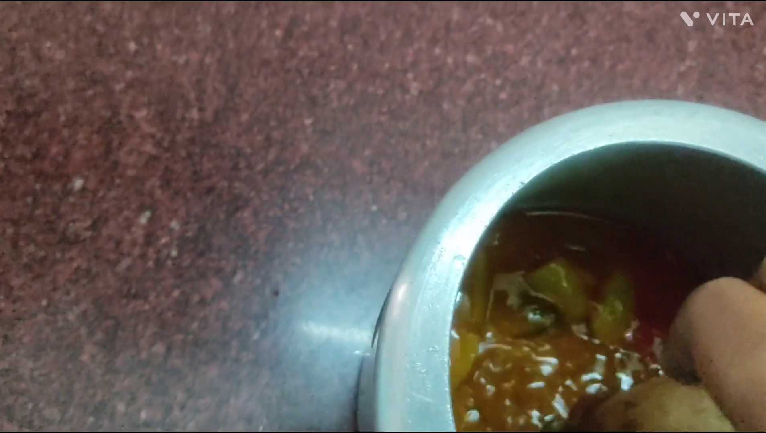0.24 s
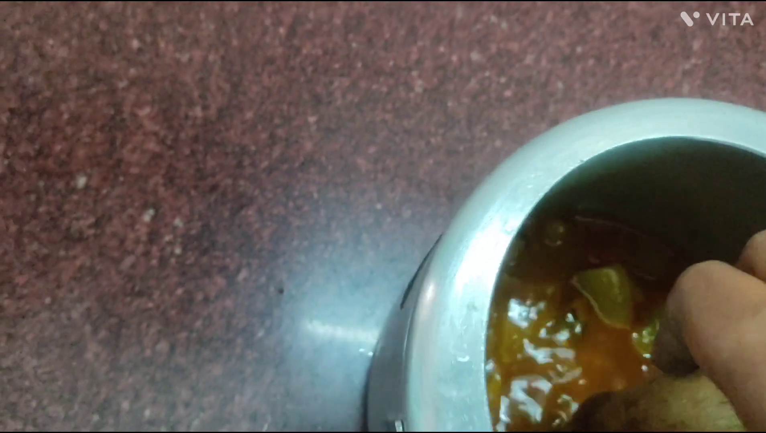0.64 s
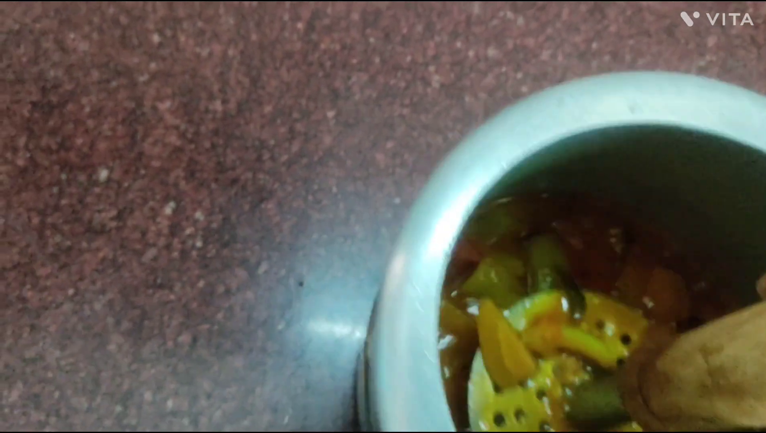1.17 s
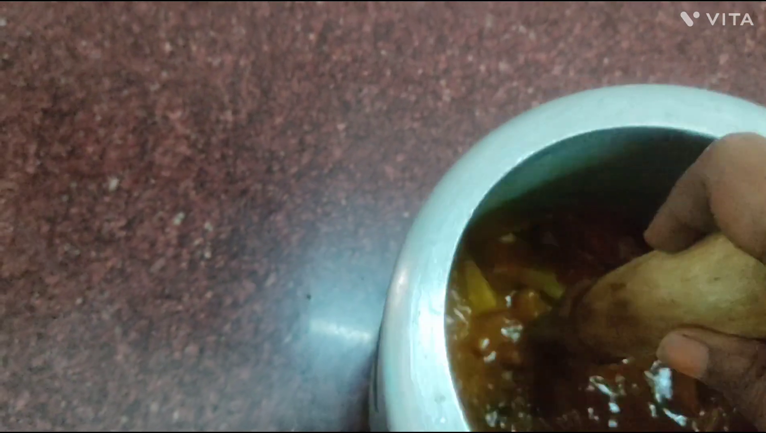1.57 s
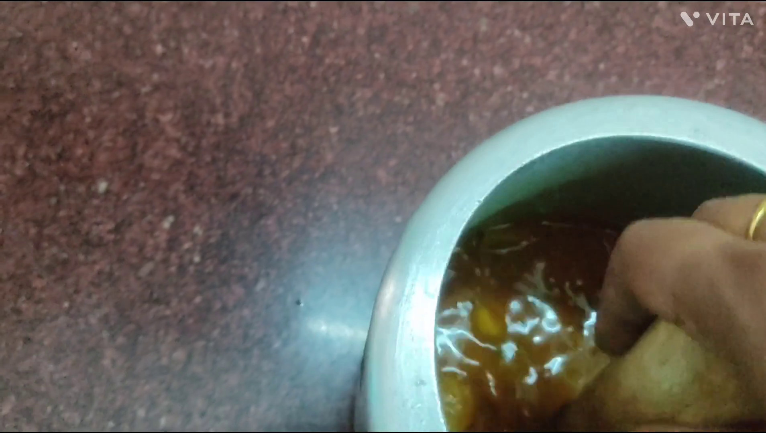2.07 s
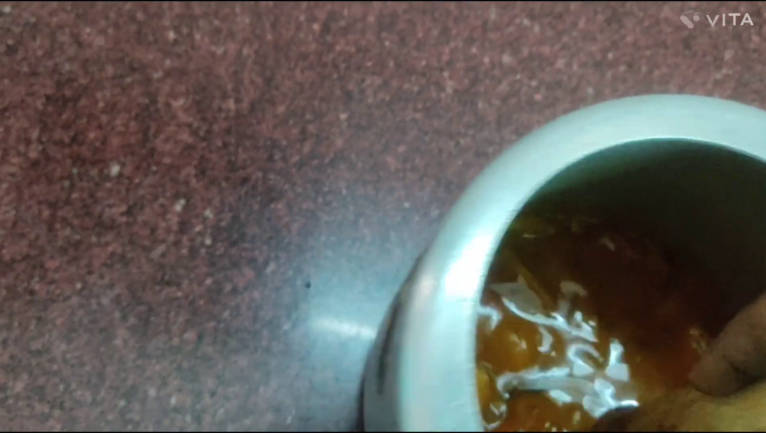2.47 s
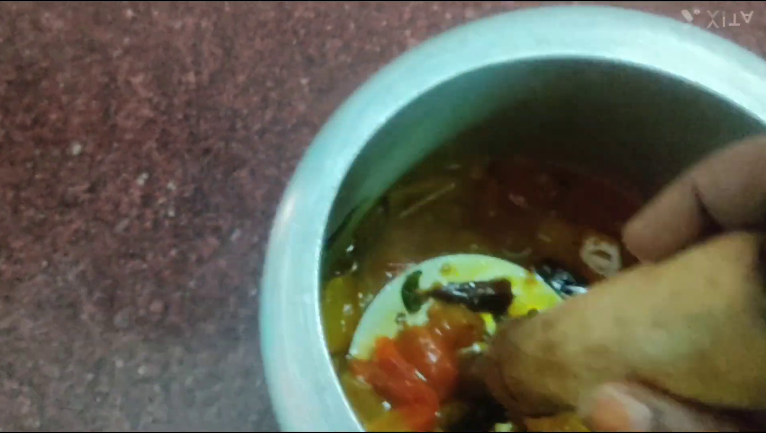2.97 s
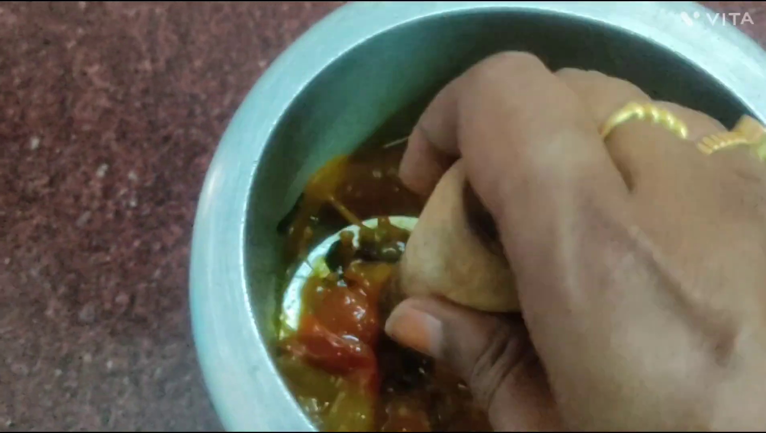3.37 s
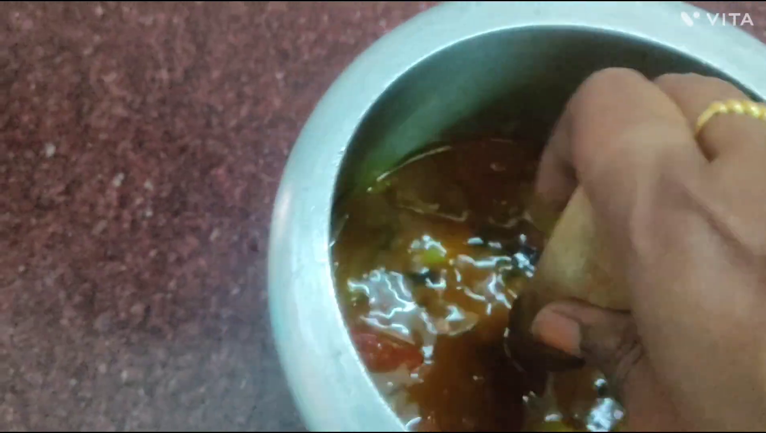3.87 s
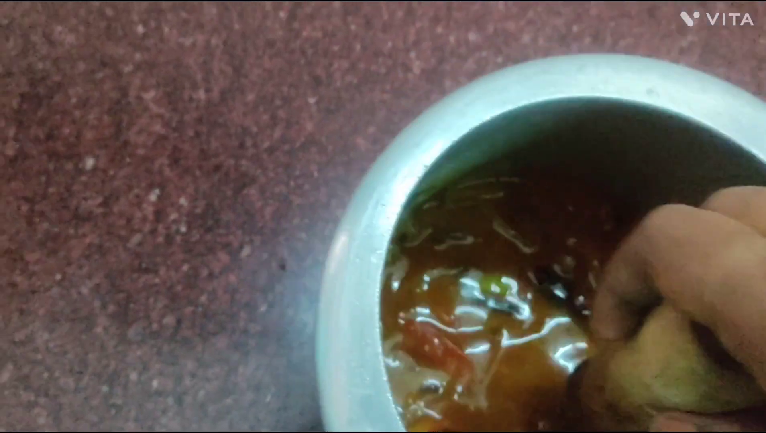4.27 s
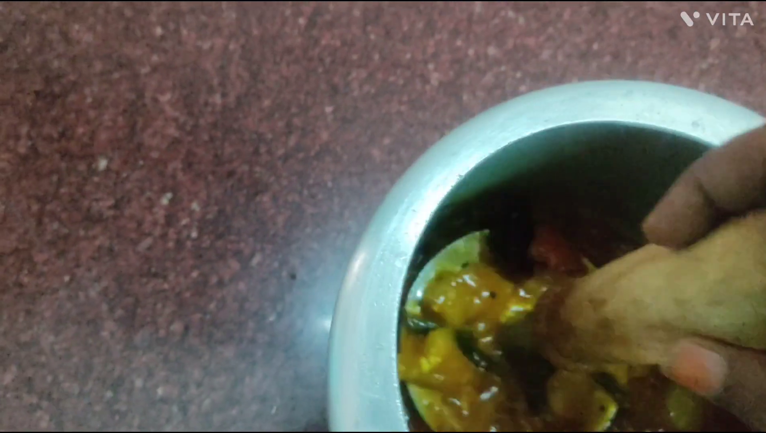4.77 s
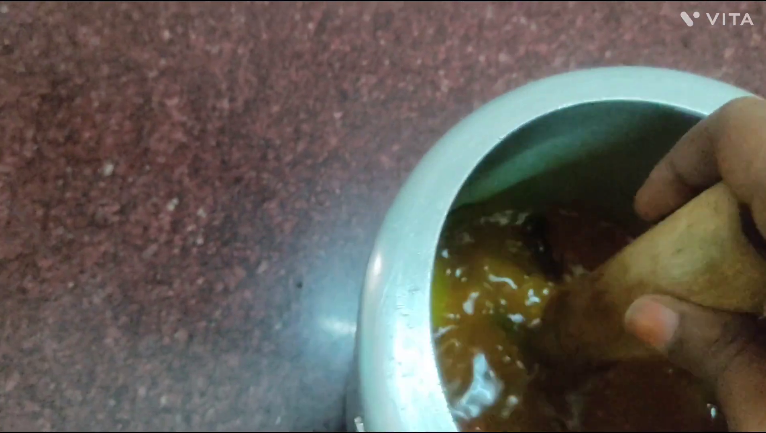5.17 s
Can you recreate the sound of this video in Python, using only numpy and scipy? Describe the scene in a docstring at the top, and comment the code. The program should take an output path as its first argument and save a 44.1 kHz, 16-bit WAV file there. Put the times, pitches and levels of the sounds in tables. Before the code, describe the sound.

Close up in a kitchen, a perforated masher presses soft vegetables in a metal pot. A double knock comes near one second, then wet clicks and faint bird chirps, another knock group near three, a squelchy burst of snaps at three and a half, a quiet lull, then clanks and a bright rim ring at five. Treble leans right; the hum is very low.

```python
"""A masher presses soft vegetables in gravy inside a metal pot: its plate knocks the pot (decaying modes,
thump, crack) and the bare rim rings once. Short treble snaps are wet smacks and the sharp cracks of
knocks and rim; gravy squelches (crackling noise), bubbles and gulps glide. Behind: a chirping bird (swept
whistle), slosh, rub, whine, sizzle and kitchen hum (shaped noise). Random echo taps and the tone colour
of each channel, with a sharp treble resonance on the right, shape the near sounds."""
import sys
import numpy as np
from scipy import signal
from scipy.io import wavfile
from scipy.ndimage import uniform_filter1d

SR = 44100
rng = np.random.default_rng(int(sys.argv[2]) if len(sys.argv) > 2 else 0)


def log_audio(samples):
    """Write samples as a 16-bit WAV file to the path given in sys.argv[1]."""
    # one column per channel
    frames = np.atleast_2d(samples).T
    # limit to full scale, then quantise
    limited = np.clip(frames, -1, 1)
    pcm = np.round(limited * 32767).astype(np.int16)
    wavfile.write(sys.argv[1], SR, pcm)


N = 239815

# kitchen hum spectrum: (frequency [Hz], relative density [dB])
HUM_SPECTRUM = [(5, 5.5), (25, 1.5), (45, -12), (70, -6), (110, -10.5), (250, -14), (660, -22),
                (1100, -27.5), (4000, -32.5), (5200, -57)]
HUM_LEVEL_DB = -63
# fine sizzle of the hot gravy: (frequency [Hz], relative density [dB]); (time [s], level [dB])
SIZZLE_SPECTRUM = [(1760, -61), (3000, -35.5), (3650, -31.5), (3960, -16.5), (4200, -16.5), (4690, -18),
                   (5300, -16), (6410, -17.5), (7000, -1), (7240, 0), (7630, -4.5), (8040, -12),
                   (9600, -21.5), (10300, -48.5), (15600, -84), (22000, -120)]
SIZZLE_LEVEL = [(0, -61.5), (.25, -59), (.5, -66), (.75, -59), (0.948, -64), (1.4, -62.5), (1.85, -65.5),
                (2.199, -60.5), (2.45, -63.5), (3.05, -58.5), (3.151, -64), (3.5, -75), (4, -58.5),
                (4.3, -69.5), (4.48, -57.5), (5.3, -63), (5.39, -57.5)]
# faint thin whine that dies away: (frequency [Hz], relative density [dB]); (time [s], level [dB])
WHINE_SPECTRUM = [(4500, -54.0), (4680, 2.0), (4760, 0.5), (4950, -55.0)]
WHINE_LEVEL = [(.3, -74.5), (.6, -80), (.75, -96.5)]
# wet rub along the wall: (frequency [Hz], relative density [dB]); (time [s], level [dB])
RUB_SPECTRUM = [(3600, -42.5), (4300, -7.5), (5500, 4), (6300, -3.5), (7000, -34.5)]
RUB_LEVEL = [(0, -78), (.7, -70), (1.6, -63.5), (2.201, -68), (2.4, -93.5)]
# low slosh of the stirred pot: (frequency [Hz], relative density [dB]); (time [s], relative level [dB])
SLOSH_SPECTRUM = [(60, -46.0), (130, -5.0), (190, 7), (300, -2.0), (500, -16.5), (900, -42.5)]
SLOSH_LEVEL = [(0.0, -122), (0.98, -71), (1.15, -63.5), (2.54, -67.5), (2.88, -57.5), (4.3, -65),
               (4.851, -54.5), (5.44, -66)]
# stereo of steady sounds: (frequency [Hz], left minus right [dB])
STEREO_LEAN = [(60, 4), (110, 2), (200, 3), (380, 5), (700, 4.5), (1290, -2.5), (2380, -1), (4400, -8.5),
               (8120, -13.5), (15000, 8.5)]
# stereo of steady sounds: (frequency [Hz], likeness of the channels [0-1])
STEREO_LIKENESS = [(60, 0.2), (180, 0.17), (550, 0.73), (1650, 0.025), (4970, 0.05), (15000, 0.59)]

# late kitchen echo: (frequency [Hz], t60 [s])
KITCHEN_T60 = [(150, 1), (500, 0.74), (1500, 0.65), (4000, 0.69), (9000, 0.44)]
ECHO_TURN_HZ, EARLY_T60_S = 6.5, 0.041
# tone colour of each channel, treble resonance on the right, steep drop above 10 kHz:
# (frequency [Hz], gain [dB])
LEFT_COLOUR = [(40, -11), (150, 1.5), (700, 1), (1200, -1), (2000, 1.5), (5000, -11), (8500, -3),
               (9600, -2), (10300, -13.5), (15000, -47)]
RIGHT_COLOUR = [(40, -15.5), (150, -3), (700, -2), (2000, 4), (5500, 3), (6600, 3), (7500, 13), (8400, 5.5),
                (9600, -5.5), (10300, -19), (15000, -33)]
BAND_LIMIT_HZ = 15700

# rising bird chirps: (time [s], length [s], top frequency [Hz], relative level [dB])
CHIRPS = [(1.455, 0.044, 5560, -57), (1.649, 0.056, 5700, -61), (1.736, 0.073, 5800, -62),
          (1.78, 0.03, 5370, -64), (1.822, 0.088, 5980, -59), (1.86, 0.038, 5600, -72),
          (1.928, 0.11, 6190, -59), (1.997, 0.049, 5800, -69), (2.083, .11, 5820, -62.5),
          (2.143, 0.061, 5130, -66)]
SWEEP_HZ_PER_S = 24000

# short damped tones gliding up, bubbles and a brief ring of the pot:
# (time [s], relative level [dB], nominal pitch [Hz])
GLIDES = [(0.631, -40.5, 2600), (.638, -44.5, 2660), (.652, -47, 2580), (0.629, -50.5, 1570),
          (1.014, -35.5, 1330), (1.016, -43, 1990), (1.115, -20.5, 1940), (1.167, -31.5, 2510),
          (1.231, -34, 1976), (1.347, -42, 2550), (1.491, -43, 1400), (2.679, -51, 2380),
          (2.7435, -16, 2925), (2.976, -34.5, 1270), (2.977, -21.5, 2550), (3.097, -33.5, 1307),
          (3.099, -31, 2010), (3.323, -25, 2530), (3.431, -23, 5260), (3.448, -19, 4010),
          (3.455, -23, 3000), (4.022, -50, 876), (4.543, -36, 1360), (4.601, -34.5, 1333),
          (4.688, -29, 3730), (4.686, -26.5, 1833), (4.691, -22, 2356), (4.804, -37.5, 4470),
          (4.897, -30, 3010), (4.931, -29, 3310), (4.932, -21, 4280), (4.978, -26, 4340),
          (4.979, -28, 5430)]
GLIDE_T60_CYCLES = 78.6
# closing air pockets: (time [s], relative level [dB], start [Hz], end [Hz])
GULPS = [(1.548, -43, 5150, 2455), (2.967, -35.5, 3630, 1344)]
GULP_FALL_S, GULP_T60_S = 0.003, 0.14  # time constant of the pitch fall; decay
# bright top of some snaps: (time [s], relative level [dB])
BRIGHT_TOPS = [(1.3586, -29.5), (1.4164, -30), (1.519, -19.5), (1.529, -18.5), (1.548, -12.5),
               (3.9714, -32), (4.6872, -18.5), (4.8913, -22), (4.929, -16), (4.9395, -6), (4.978, -16)]
BRIGHT_HZ, BRIGHT_T60_S = 12820, 0.021
# short treble snaps, wet smacks and the sharp cracks of knocks and rim:
# (time [s], relative level [dB], centre [Hz])
SNAPS = [(0.2434, -34, 6540), (0.686, -25.5, 6100), (0.7102, -28, 6200), (0.888, -26.5, 7270),
         (0.9339, -27, 7330), (1.033, -23.5, 8800), (1.081, -9, 7570), (1.29, -19.5, 7860),
         (1.3594, -37, 5800), (1.4165, -31.5, 9000), (1.492, -34.5, 7800), (1.5191, -16.5, 7300),
         (1.5214, -18.5, 4700), (1.529, -15, 7700), (1.532, -12, 7740), (1.5484, -4.5, 7120),
         (1.616, -19, 7590), (1.6818, -32.5, 7700), (1.9189, -31, 5500), (1.9961, -25.5, 7700),
         (2.048, -30, 8200), (2.285, -40, 9200), (2.303, -28, 7870), (2.3106, -27, 8500),
         (2.367, -35, 7970), (2.667, -30, 6500), (2.7017, -4.5, 7000), (2.744, -11, 6900),
         (2.963, -38, 7740), (3.1025, -32.5, 7460), (3.207, -40.5, 8660), (3.25, -44, 8400),
         (3.267, -46.5, 8200), (3.311, -24.5, 7100), (3.426, -20, 7550), (3.44, -13, 7340),
         (3.4493, -7.5, 7300), (3.452, -7.5, 7200), (3.457, -13, 7400), (3.461, 0, 7300),
         (3.4629, -10, 7600), (3.469, -13, 7950), (3.474, -16, 7700), (3.477, -13, 7700),
         (3.4792, -13, 7600), (3.4831, -4, 8000), (3.486, -13, 7700), (3.5004, -11.5, 7860),
         (3.504, -11.5, 7450), (3.564, -17.5, 7070), (3.576, -29, 7700), (3.8168, -28.5, 8700),
         (3.97, -28, 6100), (4.174, -41, 8450), (4.1866, -29, 6350), (4.254, -35, 8950),
         (4.2687, -32, 8470), (4.39, -39.5, 7740), (4.509, -27, 7750), (4.563, -16.5, 7360),
         (4.688, -14, 5900), (4.774, -30, 6840), (4.8048, -16.5, 7900), (4.865, -29, 6900),
         (4.8925, -17.5, 6800), (4.9123, -17, 7700), (4.9298, -10.5, 6300), (4.934, -10, 7400),
         (4.938, -9.5, 7600), (4.9766, -15, 7260), (4.9928, 0, 8400), (4.9958, -1.5, 7660),
         (5.003, -7, 5420), (5.017, -25, 5400)]
SNAP_T60_S = 0.01
WIDE_DB, WIDE_GROWTH = -12, 0.45  # wide noise at level 0 dB; dB it loses per dB of a softer snap
# faint snaps scattered at random
FAINT_COUNT, FAINT_MIN_DB, FAINT_SPREAD_DB = 50, -46.5, 6
FAINT_LOW_HZ, FAINT_HIGH_HZ = 6480, 9180
# gravy squeezed through the holes:
# (full from [s], hold [s], relative level [dB], body [dB], hum of the pot wall [dB])
SQUELCHES = [(1.555, 0.015, -43.5, -2.5, -18.5), (3.444, 0.034, -18, -14.5, -20.5),
             (4.902, 0.018, -34.5, -12.5, -30)]
SWELL_DB_PER_S, SAG_DB_PER_S, WALL_HZ = 324.5, 593.5, 893
# resonances of the plate's holes: (frequency [Hz], width as a share [1], level [dB])
HOLES = [(1326, 0.05, 5.5), (2230, 0.078, 3.5), (3100, 0.32, -2.5), (5510, 0.057, 6)]

# modes of the bare rim: (frequency [Hz], relative level [dB], t60 before the length factor [s])
RIM_MODES = [(882, -26, 0.4), (1035, -24, 0.4), (1345, -11, 0.08), (1894, -22, 0.2), (2115, -16, 0.06),
             (2537, -15, .06), (2567, -12, 0.2), (2627, -2, 0.22), (4565, -21, .14), (4942, -28, 0.2),
             (5225, -18, 0.26), (5290, -21, .2), (5360, -19, 0.22), (5426, -19, .22), (5640, -23, 0.15),
             (6912, -22, 0.18)]
RIM_TIME_S, RIM_LEVEL_DB, RIM_ECHO_DB = 4.994, -18.5, -13
# masher knocks on the pot: (time [s], relative level [dB], thud [dB], clack [dB],
# ring length factor [1, clipped to 1.5], plate pitch [Hz], plate [dB])
KNOCKS = [(0.967, -48, 1.5, -14, 2.3, 1180, -16), (1.08, -11.5, -16.5, -7.5, 1.12, 1180, 4),
          (1.115, -17.5, -7.5, -14, 0.65, 1255, -5), (1.131, -24.5, 9.5, -23, 0.28, 1256, -13),
          (1.673, -43.5, 7, -5, 1.04, 1150, -15), (2.648, -30, 6.5, -3.5, 1.17, 1183, -12.5),
          (2.704, -10, -17, -8, 1.02, 1156, 3), (2.747, -14.5, -1, 4.5, 0.21, 1247, -4),
          (2.763, -23, 7.5, -31, 0.32, 1340, -22), (2.966, -20.5, 2, -3, 0.59, 1199, -3),
          (3.09, -29.5, -8.5, -17, 0.66, 1200, 2.5), (3.102, -32, 13.5, -22, 0.56, 1330, -3.5),
          (3.314, -20, -15.5, 1.5, 0.25, 1198, -2), (3.325, -25, 15.5, -15, 0.7, 1304, -2),
          (3.516, -22.5, -2, -5.5, 0.57, 1146, -4), (4.565, -15, -9, -14, 0.35, 1197, -11),
          (4.602, -18.5, 2, 8, 0.36, 1296, -3.5), (4.791, -16.5, -24.5, -1, 0.39, 1200, 5.5),
          (4.804, -14.5, 3, 1, 0.35, 1213, -12)]
# modes of the pot: (frequency [Hz], relative level [dB], t60 before the length factor [s])
POT_MODES = [(95, -15, 0.14), (162.6, -9.5, 0.15), (186.1, -4, 0.36), (239.2, -6, 0.48), (354.4, -9, 0.31),
             (500.4, -3.5, 0.25), (524.8, -7.5, 0.14), (631.4, -10, 0.16), (715, -16, .25),
             (881.5, -10.5, 0.36), (1037, -26.5, 0.45), (1192, -28.5, 0.072), (1497, -17, 0.13),
             (1740, -10.5, 0.17), (1905, -9, 0.12), (3110, -13, 0.094), (4080, -14, 0.061),
             (5370, -13, 0.096)]
# modes of the masher's plate: (multiple of its pitch [1], relative level [dB], t60 before the length factor [s])
PLATE_MODES = [(.36, -1.5, .09), (.42, 1.5, .14), (.52, -3, 0.24), (1, 0, 0.16), (2.2, -13, .06),
               (3.77, -11, 0.052)]
PLATE_FREE_S, PLATE_DAMPED_DB = 0.016, -20  # then the food closes over the plate
BASS_RISE_CYCLES = 1.61  # the heavy pot takes a few cycles to start moving
PUSH_HALF_WIDTH_S, PUSH_HZ = 0.0035, 201.4  # low push of a thud
CRACK_DB, CRACK_GROWTH = 0, 0.62  # crack at level 0 dB; extra dB it loses per dB of a softer blow


def amp(db):
    """Decibels to amplitude."""
    return 10 ** (np.asarray(db, float) / 20)


def evened(x):
    """Scale to unit RMS."""
    return x / np.sqrt(np.mean(x ** 2) + 1e-20)


def read(points, hz):
    """Interpolate (Hz, value) points over log frequency."""
    f, value = np.transpose(points)
    return np.interp(np.log(hz + 1), np.log(f + 1), value)


def add(mix, s, sound):
    """Add a sound into the mix at s seconds."""
    part = mix[round(s * SR):][:len(sound)]
    part += sound[:len(part)]


def band(x, hz, share):
    """Band-pass around hz, from hz / (1 + share) to hz * (1 + share)."""
    edges = np.clip([hz / (1 + share), hz * (1 + share)], 20, SR / 2.2)
    return signal.sosfilt(signal.butter(2, edges, "bandpass", fs=SR, output="sos"), x)


def causal(points):
    """Minimum-phase taps for a (Hz, dB) colour."""
    log_gain = np.log(amp(read(points, abs(np.fft.fftfreq(4096, 1 / SR)))))
    return np.fft.ifft(np.exp(np.conj(signal.hilbert(log_gain)))).real[:2048]


def steady(spectrum, curve, patchy_db):
    """Two-channel noise with drifting patches whose level follows a curve."""
    frames, hz = N // 256 + 5, np.fft.rfftfreq(1024, 1 / SR)
    a, b, c, d, patches = rng.standard_normal((frames, 513, 5)).T
    patches = uniform_filter1d(patches, size=8, axis=1)
    patches = evened(uniform_filter1d(patches, size=10, axis=0))
    likeness = np.clip(read(STEREO_LIKENESS, hz), -1, 1)[:, None]
    lean = amp(read(STEREO_LEAN, hz))[:, None]
    left = a + 1j * b
    right = likeness * left + np.sqrt(1 - likeness ** 2) * (c + 1j * d)
    z = np.array([lean * left, right]) / (1 + lean)
    z = z * amp(read(spectrum, hz)[:, None] + patchy_db * patches)
    x = signal.istft(z, nperseg=1024, noverlap=768)[1][:, :N]
    level_db = np.interp(np.arange(N) / SR, *np.transpose(curve))
    return x / x.mean(0).std() * amp(level_db)


def hum():
    """Kitchen hum: low noise at a constant level."""
    return steady(HUM_SPECTRUM, [(0, HUM_LEVEL_DB), (6, HUM_LEVEL_DB)], patchy_db=0.45)


def sizzle():
    """Hot gravy: patchy treble noise of varying level."""
    return steady(SIZZLE_SPECTRUM, SIZZLE_LEVEL, patchy_db=4.5)


def whine():
    """Thin whine: very narrow noise that dies away."""
    return steady(WHINE_SPECTRUM, WHINE_LEVEL, patchy_db=2.0)


def rub():
    """Wet rub along the wall: patchy mid-treble noise."""
    return steady(RUB_SPECTRUM, RUB_LEVEL, patchy_db=4)


def slosh():
    """Stirred pot: low noise that swells and sinks."""
    return amp(1.5) * steady(SLOSH_SPECTRUM, SLOSH_LEVEL, patchy_db=2.5)


def echoes(early_db):
    """Sparse taps of random sign, each band dying at its own speed, other taps for each channel."""
    taps = np.zeros((2, SR))
    at = np.arange(40, SR - 20, 20) + rng.integers(0, 20, (2, (SR - 41) // 20))
    np.put_along_axis(taps, at, rng.choice([-1., 1.], at.shape), 1)
    hz, t, z = signal.stft(taps, SR, nperseg=256)
    share = 1 / (1 + (hz[:, None] / 900) ** 2)  # long waves reach both channels alike
    z[1] = share * z[0] + np.sqrt(1 - share ** 2) * z[1]
    early = amp(early_db - 60 * t / EARLY_T60_S)  # dense echoes inside the pot and off the counter
    late = amp(-60 * t / read(KITCHEN_T60, hz)[:, None])
    tail = signal.istft(z * (early + late), SR, nperseg=256)[1]
    return tail / np.linalg.norm(tail[0])


def kitchen(x, early_db):
    """Two random echo patterns, weighted by sine and cosine, alternate steadily."""
    turn = 2 * np.pi * ECHO_TURN_HZ * np.arange(N) / SR
    wet = 0
    for weight in (np.sin(turn), np.cos(turn)):
        wet = wet + signal.fftconvolve((x * weight)[None], echoes(early_db), axes=1)[:, :N]
    return wet


def channel_colour(x):
    """Tone colour of each channel: treble resonance on the right, steep drop above 10 kHz."""
    colours = (LEFT_COLOUR, RIGHT_COLOUR)
    return np.array([signal.oaconvolve(c, causal(points))[:N] for c, points in zip(x, colours)])


def chirp(s, length_s, top_hz, level_db):
    """Bird: a wavering whistle that sweeps upward."""
    hz = np.linspace(top_hz - SWEEP_HZ_PER_S * length_s, top_hz, round(length_s * SR))
    hz = hz * (1 + 0.023 * evened(uniform_filter1d(rng.standard_normal(len(hz)), size=60)))
    return s, amp(level_db) * np.sin(2 * np.pi * np.cumsum(hz) / SR) * np.hanning(len(hz))


def glide(s, level_db, hz):
    """Bubble or brief pot ring: a short damped tone gliding up, blurred by noise around its pitch."""
    t = np.arange(SR // 8) / SR
    tone = np.sin(2 * np.pi * hz * (1.04 * t + 0.001087 * np.exp(-t / 0.013)))
    blur = evened(band(rng.standard_normal(len(t)), hz, 0.17))
    envelope = amp(level_db - 60 * t * hz / GLIDE_T60_CYCLES) * (1 - np.exp(-t / 0.0013))
    return s - 0.0007, envelope * (0.5 * tone + 0.5 * blur)


def gulp(s, level_db, from_hz, to_hz):
    """A pocket of air closes: a wavering tone that drops quickly, then settles."""
    t = np.arange(SR // 8) / SR
    waver = evened(uniform_filter1d(rng.standard_normal(len(t)), size=80))
    hz = (to_hz + (from_hz - to_hz) * np.exp(-t / GULP_FALL_S)) * (1 + 0.06 * waver)
    envelope = amp(level_db - 60 * t / GULP_T60_S) * (1 - np.exp(-t / 0.0014))
    return s, envelope * np.sin(2 * np.pi * np.cumsum(hz) / SR)


def bright_top(s, level_db):
    """Bright top of a snap: a short noise burst around 12.8 kHz."""
    t = np.arange(SR // 16) / SR
    hiss = band(rng.standard_normal(len(t)), BRIGHT_HZ, 0.31)
    hiss = evened(band(hiss, BRIGHT_HZ, 0.31))
    return s, amp(level_db - 60 * t / BRIGHT_T60_S) * (1 - np.exp(-t / 0.00096)) * hiss


def snap(s, level_db, hz):
    """Wet smack or sharp crack: a rounded treble burst around its centre over faint wide noise."""
    t = np.arange(SR // 8) / SR
    noise = rng.standard_normal((2, len(t))) * amp(-60 * t / SNAP_T60_S) * (1 - np.exp(-t / 0.0004))
    narrow = band(band(noise[0], hz, 0.18), hz, 0.18)
    wide = band(band(noise[1], 3800, 1.5), 3800, 1.5)
    burst = narrow + amp(WIDE_DB + WIDE_GROWTH * level_db) * wide
    return s - 0.0005, amp(level_db - 16.5) * burst / burst[:100].std()


def squelch(s, hold_s, level_db, body_db, wall_db):
    """A dense crackle of tiny bursts through several rough resonances; it swells, holds and sags."""
    t = np.arange(-SR // 8, SR // 8) / SR
    pops = amp(3.0 * rng.exponential(1, len(t))) * (rng.random(len(t)) < 700 / SR)  # 700 per second
    puffs = signal.lfilter([1], [1, -np.exp(-1 / (0.00076 * SR))], pops) + 0.3
    spray = puffs * rng.standard_normal(len(t))
    top = amp(-14) * evened(band(spray, 7500, 0.32))
    body = amp(body_db) * evened(sum(amp(db) * band(spray, hz, share) for hz, share, db in HOLES))
    press_db = SWELL_DB_PER_S * np.minimum(t, 0) - SAG_DB_PER_S * np.maximum(t - hold_s, 0)
    # the wall hum follows the press twice
    wall = amp(wall_db + press_db) * evened(band(spray, WALL_HZ, 0.028))
    return s + t[0], amp(level_db + press_db) * (top + body + wall) * signal.windows.tukey(len(t), 0.1)


def ring(modes, level_db, length, split, rough_db, rise_cycles=0.12):
    """Each decaying mode is a close, randomly detuned pair with random level flutter."""
    hz, db, t60_s = np.transpose(modes)[:, :, None]
    t, luck = np.arange(SR // 2) / SR, rng.standard_normal((3, len(modes), 1))
    pair = np.sin(2 * np.pi * hz * t + 0.5 * luck[0])
    pair = pair + 0.56 * np.sin(2 * np.pi * hz * (1 + split * luck[1]) * t + 0.5 * luck[2])
    flutter = signal.resample(rng.standard_normal((len(modes), 40)), len(t), axis=1)
    flutter = flutter * np.minimum(t / 0.023, 1)
    envelope = amp(db + level_db + rough_db * flutter - 60 * t / (t60_s * length))
    rise = 1 - np.exp(-(t * hz / rise_cycles) ** 2)
    return (envelope * pair * rise).sum(0)


def rim_ring():
    """The bare rim rings freely when it is struck."""
    return RIM_TIME_S, ring(RIM_MODES, RIM_LEVEL_DB, 0.96, split=0.0012, rough_db=2.2)


def knock(s, level_db, thud_db, clack_db, length, plate_hz, plate_db):
    """The blow's spectrum drives the pot's modes; plate, blunt thump and noisy crack ride on top."""
    blow = [(95, -1.5), (160, thud_db + 6.5), (250, thud_db + 4.0), (450, -0.5), (1350, 0.1),
            (1800, clack_db), (8000, clack_db)]
    drive_db = read(blow, np.transpose(POT_MODES)[0])[:, None]
    pot = ring(POT_MODES, drive_db, np.clip(length, 0.05, 1.5), split=0.014, rough_db=4.0,
               rise_cycles=BASS_RISE_CYCLES)
    t = np.arange(len(pot)) / SR
    plate = ring(np.multiply(PLATE_MODES, [plate_hz, 1, 1]), plate_db, 0.85, split=0.0045, rough_db=0.5)
    plate *= amp(PLATE_DAMPED_DB * np.clip((t - PLATE_FREE_S) / 0.0025, 0, 1))
    noise = rng.standard_normal((2, len(t)))
    thump = amp(-5.0 - 60 * t / 0.06) * evened(band(noise[0], 520, 0.5))
    push = np.exp(-((t - 2 * PUSH_HALF_WIDTH_S) / PUSH_HALF_WIDTH_S) ** 2)
    push = amp(thud_db + 1.0) * push * np.cos(2 * np.pi * PUSH_HZ * t)
    body = pot / pot[:800].std() + plate + thump + push
    body *= 1 - np.exp(-t / 0.00092)  # soft food cushions the contact
    crack = band(band(noise[1], 4400, 1.0), 4400, 1.4) * amp(-60 * t / 0.063)
    crack_db = level_db * (1 + CRACK_GROWTH) + CRACK_DB
    return s - 0.0012, amp(level_db - 13.5) * body + amp(crack_db) * crack


def scene():
    """Place the events, add their echoes, colour the channels and lay in the steady sounds."""
    pot, rim, treble, bird = np.zeros((4, N))  # treble: gravy sounds and all snaps
    for mix, source, rows in ((bird, chirp, CHIRPS), (treble, glide, GLIDES), (treble, gulp, GULPS),
                              (treble, bright_top, BRIGHT_TOPS), (treble, snap, SNAPS),
                              (treble, squelch, SQUELCHES), (pot, knock, KNOCKS)):
        for row in rows:
            add(mix, *source(*row))
    for when, size, pitch in rng.random((FAINT_COUNT, 3)):
        hz = FAINT_LOW_HZ + pitch * (FAINT_HIGH_HZ - FAINT_LOW_HZ)
        add(treble, *snap(0.033 + when * N / SR, FAINT_MIN_DB + FAINT_SPREAD_DB * size, hz))
    add(rim, *rim_ring())
    wet = kitchen(amp(-3.0) * pot + amp(RIM_ECHO_DB) * rim + amp(3.5) * bird, early_db=14)
    wet = wet + kitchen(amp(-7.5) * treble, early_db=12)
    treble_stereo = treble * amp([[-4], [0]])  # left, right
    near = channel_colour(pot + rim + treble_stereo + amp(-3.5) * bird + wet)
    return near + slosh() + hum() + rub() + whine() + sizzle()


def record(dry):
    """The loudest peaks are rounded off by overload; then the band limit."""
    rounded = 1.1 * np.tanh(dry / 1.1)
    low_pass = signal.firwin(511, BAND_LIMIT_HZ, window=("kaiser", 9), fs=SR)
    return signal.oaconvolve(rounded, low_pass[None], "same")


dry = scene()
out = record(dry)
log_audio(out)
```